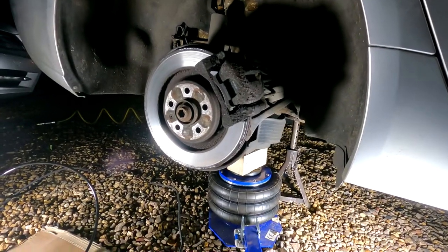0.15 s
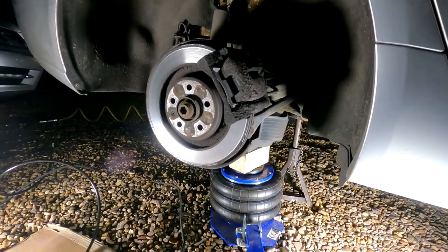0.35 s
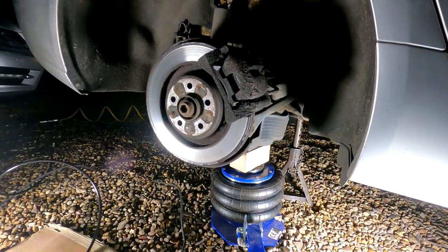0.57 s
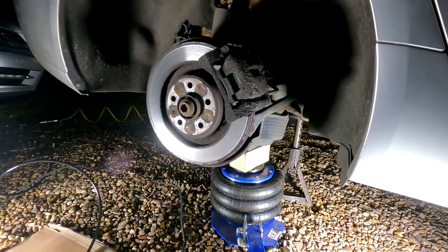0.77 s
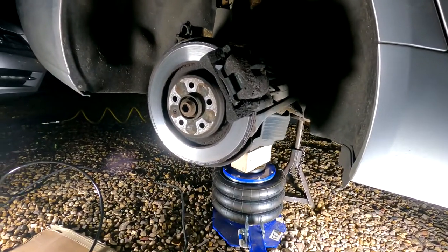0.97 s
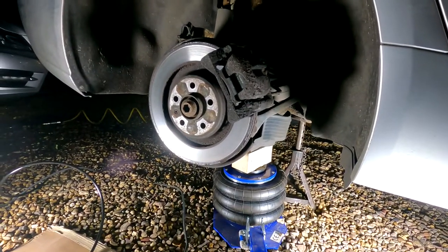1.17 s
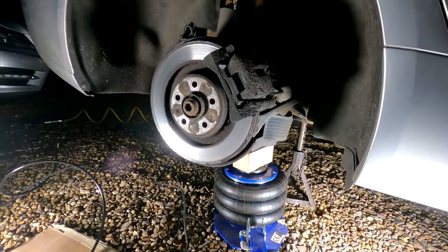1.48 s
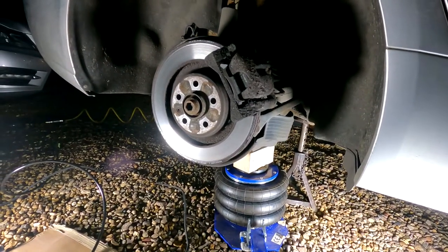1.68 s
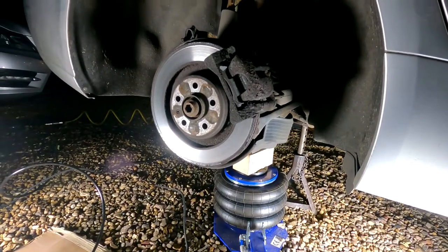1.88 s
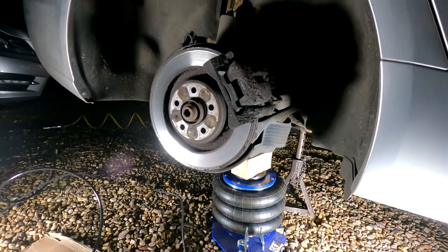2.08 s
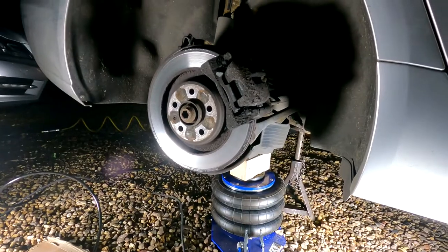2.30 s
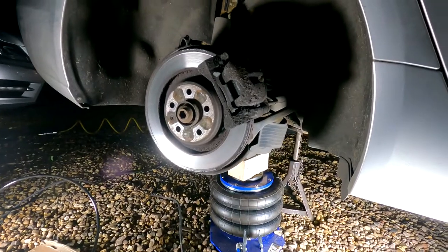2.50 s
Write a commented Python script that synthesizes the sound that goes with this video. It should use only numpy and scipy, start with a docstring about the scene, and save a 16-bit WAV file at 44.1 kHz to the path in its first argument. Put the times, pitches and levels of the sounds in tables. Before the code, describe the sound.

Compressed air hisses and whistles steadily into an air-bag jack, with a thump and a clack.

```python
"""A steady, whistling hiss: compressed air fills a rubber air-bag jack under a car on gravel, close by.
The jet hisses with early echoes and sings in resonances of valve and hose that shift as pressure builds.
Over an uneven low rumble the load settles with light ticks, two small hollow knocks, two dull thumps
and one sharp clack that rings the jack."""
import sys
import numpy as np
from scipy import signal
from scipy.fft import rfft, irfft
from scipy.io import wavfile

SR = 44100
rng = np.random.default_rng(int(sys.argv[2]) if len(sys.argv) > 2 else 0)


def int16_out(signal):
    """Quantize to a 16-bit WAV file."""
    q = np.round(np.clip(np.atleast_2d(signal).T, -1, 1) * 32767)
    wavfile.write(sys.argv[1], SR, q.astype(np.int16))


N = 116865

# tone colour of a light contact, for ticks and knocks: freq_hz, level_db
CONTACT_COLOUR = [(100, -25.5), (500, -5.5), (1400, -1), (3500, -5), (8000, -11.5), (10500, -22),
                  (14000, -33)]


def undb(db):
    """Decibels to gain."""
    return 10 ** (np.asarray(db) / 20)


def unit(x):
    """Scale to rms 1."""
    return x / np.sqrt(np.mean(x ** 2))


def freqs():
    """Frequency of each spectral bin, at least 1 Hz."""
    return np.maximum(np.arange(N // 2 + 1) * SR / N, 1)


def across(points):
    """Join (freq_hz, value) points on a log-frequency axis."""
    hz, value = np.array(points, float).T
    return np.interp(np.log(freqs()), np.log(hz), value)


def noise(gain):
    """Noise of rms 1, coloured by a gain per bin."""
    return unit(irfft(rfft(rng.standard_normal(N)) * gain, N))


def wide(gain, diffuse):
    """Stereo noise: a shared centre plus a diffuse part of its own in each ear."""
    return (noise(gain) + diffuse * np.array([noise(gain), noise(gain)])) / np.hypot(1, diffuse)


def walk(hz):
    """Slow random wander of rms 1."""
    return noise(1 / (1 + (freqs() / hz) ** 2))


def pan(db):
    """Stereo gains that put the left db above the right."""
    return undb(np.array([[db], [-db]]) / 2)


def decay(age, t60):
    """Silence, then an exponential fall of 60 dB in t60 seconds."""
    return (age >= 0) * np.exp(-np.log(1000) * np.maximum(age, 0) / t60)


def burst(age, colour_db, db, tilt_db, t60, diffuse):
    """A short burst of contact noise, tilted by tilt_db per octave."""
    colour = undb(colour_db + tilt_db * np.log2(freqs()))
    return wide(colour, diffuse) * undb(db) * decay(age, t60)


def ring(age, modes):
    """Struck modes that fade, each at its own rate."""
    return sum(undb(db) * np.sin(2 * np.pi * hz * age) * decay(age, t60) for hz, db, t60 in modes)


def click(start_s, colour_db, peak_db):
    """A single sharp pressure pulse."""
    pulse = irfft(undb(colour_db) * np.exp(-2j * np.pi * freqs() * start_s), N)
    return pulse / np.abs(pulse).max() * undb(peak_db)


def rumble(t):
    """A low bed in two bands, deep bass and the body above it, that comes in uneven swells."""
    # swells of the two bands: time_s, bass_db, body_db
    swells = [(0, -40, -43.5), (.12, -34.5, -37.5), (.17, -41.5, -45), (.28, -31.5, -38), (.34, -40, -45),
              (.40, -45.5, -49.5), (.80, -51, -56), (1.03, -42, -50), (1.17, -50, -54),
              (1.259, -42.5, -37.5), (1.32, -47, -54), (1.41, -37, -41.5), (1.5, -39, -48),
              (1.61, -56, -50.5), (1.66, -44, -34.5), (1.76, -39.5, -34), (1.85, -45, -48),
              (1.99, -32, -36), (2.07, -42.5, -46.5), (2.19, -38.5, -46.5), (2.3, -45.5, -48.5),
              (2.45, -45.5, -48), (2.536, -33, -32), (2.61, -42.5, -40.5), (2.65, -33, -40)]
    # tone colour of the bass: freq_hz, level_db
    bass_colour = [(15, -41), (35, -15), (60, 3), (90, 1), (120, -7), (200, -22.5), (500, -58), (2000, -75)]
    # tone colour of the body: freq_hz, level_db
    body_colour = [(60, -42), (110, -6), (145, 2.5), (210, -3.5), (270, -11.5), (330, -14), (450, -24),
                   (900, -34), (3000, -54)]
    time_s, bass_db, body_db = np.array(swells).T
    bass = wide(undb(across(bass_colour)), diffuse=0.013) * undb(np.interp(t, time_s, bass_db))
    body = wide(undb(across(body_colour)), diffuse=0.04) * undb(np.interp(t, time_s, body_db))
    return (bass + body) * pan(db=-1)


def ticks(t):
    """Small slips of jack and gravel under the growing load, each with a hollow ring."""
    # light ticks and scrapes: start_s, level_db, tilt_db_per_octave, ring_hz, t60_s
    slips = [(0.51, -36.5, -1.5, 3200, 0.051), (0.625, -37, -0.5, 4360, 0.07), (1.056, -35, 3, 8450, 0.036),
             (1.399, -20.5, 1, 2010, 0.011), (1.403, -36, -2, 1590, 0.1), (1.441, -34, 3, 1610, 0.084),
             (1.661, -35, -1.5, 4180, 0.069), (1.675, -28.5, 1, 3100, 0.04), (1.694, -37, 0, 3100, 0.071),
             (1.713, -34.5, 0, 1760, 0.063), (1.722, -32.5, 1, 1510, 0.15), (1.886, -37.5, 1, 1590, 0.14),
             (1.916, -30, 0, 1560, 0.038), (2.009, -37.5, 0, 1580, 0.049), (2.61, -36, -4.5, 1080, 0.059)]
    boost_db, width_octaves = 8.5, 0.14
    out = 0
    for start_s, db, tilt_db, ring_hz, t60 in slips:
        ring_db = boost_db * np.exp(-(np.log2(freqs() / ring_hz) / width_octaves) ** 2)
        out = out + burst(t - start_s, across(CONTACT_COLOUR) + ring_db, db, tilt_db, t60, diffuse=0.46)
    return out


def knocks(t):
    """Dull contacts that leave a brief hollow ring."""
    # small knocks: start_s, level_db
    hits = [(.249, -31.5), (1.186, -40.5)]
    # their hollow ring: pitch_hz, relative_db, t60_s
    modes = [(584, -8.5, 0.076), (1080, -5, 0.082), (1170, -7.5, 0.074)]
    out = 0
    for start_s, db in hits:
        contact = burst(t - start_s, across(CONTACT_COLOUR), db, tilt_db=-3.5, t60=.045, diffuse=0.53)
        out = out + contact + undb(db) * ring(t - start_s, modes)
    return out


def thumps(t):
    """The load settles: a snap, then a tone that dives from midrange to bass within milliseconds."""
    # dull thumps: start_s, level_db, snap_db, left_over_right_db
    hits = [(1.541, -9, -9.5, -9.5), (2.3185, -25, -52, -10)]
    # tone colour of the snap: freq_hz, level_db
    snap_colour = [(300, -6), (1100, 6.5), (2000, -2.5), (3300, -10.5), (5500, -2), (7000, -12),
                   (9000, -20), (14000, -47)]
    start_hz, first_octave_s, attack_s = 2340, 0.000208, 0.0013
    out = 0
    for start_s, db, snap_db, pan_db in hits:
        age = np.maximum(t - start_s, 0)
        phase = 2 * np.pi * start_hz * first_octave_s * np.log1p(age / first_octave_s)
        dive = -np.sin(phase) * (1 - np.exp(-age / attack_s)) * decay(age, t60=0.064)
        snap = click(start_s, across(snap_colour), snap_db)
        out = out + pan(pan_db) * (undb(db) * dive - snap)
    return out


def clack(t):
    """The load slips and catches with a double crack, rings the jack and rattles to rest."""
    # tone colour of the crack: freq_hz, level_db
    crack_colour = [(100, -20), (500, 4), (1500, 0), (2400, 0), (3900, -1.5), (5000, -25), (7700, -16),
                    (14000, -28)]
    # the hit and its rebounds: start_s, level_db, tilt_db_per_octave, t60_s
    bounces = [(1.7369, -16.5, 1.5, 0.015), (1.7386, -27, 0.5, 0.068), (1.749, -25, -2, 0.056),
               (1.755, -30, -8.5, 0.025), (1.775, -34, -3, 0.12)]
    # tone colour of the rattle: freq_hz, level_db
    rattle_colour = [(60, -23), (250, -12), (500, 2), (900, 3.5), (1600, 4.5), (2300, -12), (4000, -2.5),
                     (5000, -26), (8000, -10.5), (10500, -24), (11800, -12), (14500, -43)]
    # ring of the loaded jack: pitch_hz, relative_db, t60_s
    jack_modes = [(232, 4.5, 0.057), (301.5, 8.5, 0.0604), (513, -3, 0.05), (712, -1.5, 0.074),
                  (976, -9, 0.16), (1060, -3.5, 0.094), (1310, -3, 0.053), (1574, 7, 0.05),
                  (1673, 2, 0.036)]
    slip_s, catch_s, crack_db, ring_db = 1.7369, 1.7378, -8, -26
    slip = click(slip_s, across(crack_colour), crack_db)
    catch = -click(catch_s, across(crack_colour), crack_db)
    rattle = sum(burst(t - start_s, across(rattle_colour), db, tilt_db, t60, diffuse=0.46)
                 for start_s, db, tilt_db, t60 in bounces)
    return slip + catch + rattle + undb(ring_db) * ring(t - catch_s, jack_modes)


def reflections(count):
    """Early echoes off ground and bodywork, as a comb filter with a gain per bin."""
    echo_db = -13.5
    delays_s = rng.uniform(0.0019, .014, (count, 1))
    return 1 + undb(echo_db) * np.exp(-2j * np.pi * freqs() * delays_s).sum(axis=0)


def hiss(t):
    """Broad noise of the air jet, combed by early echoes and easing off slowly."""
    # tone colour of the jet: freq_hz, level_db
    colour = [(200, 0), (450, -5.5), (900, -0.5), (1200, -2.5), (1500, 4), (1720, -4), (2400, 1), (3000, 0),
              (3600, -2), (4400, 0.5), (5700, -3.5), (7200, 2.5), (8000, -8), (10200, -4.5), (11100, -11.5),
              (12000, -2.5), (12800, -11.5), (13800, -14.5)]
    # stereo width of the jet: freq_hz, diffuse_share
    width = [(100, 0.2), (500, 0.72), (2000, 0.39), (3700, 0.5), (6500, 0.19), (9500, 0.61), (11500, 0.3),
             (12800, 0.98)]
    start_db, fade_db_per_s = -43.5, -0.81
    share = across(width).clip(.01, .95)
    centre = rfft(rng.standard_normal(N)) * np.sqrt(1 - share ** 2) * reflections(count=6)
    diffuse = share * rfft(rng.standard_normal((2, N)))
    rush = unit(irfft(undb(across(colour)) * (centre + diffuse), N))
    return rush * undb(start_db + fade_db_per_s * t)


def whistles(t):
    """Turbulence drives narrow resonances that glide and trade strength as the bag fills."""
    # resonances of valve and hose: start_hz, end_hz, width_hz, start_db, end_db
    resonances = [(716, 725, 20, -55.5, -73.5), (1316, 1355, 38, -58, -59.5), (1911, 2005, 50, -46.5, -49),
                  (1953, 2090, 66, -43.5, -53), (2198, 2230, 39.6, -45, -43.5),
                  (2305, 2340, 88, -55, -49.5), (2548, 2670, 45, -45, -67.5),
                  (2908, 2890, 45, -55.5, -65.5), (4135, 4200, 93, -57, -58), (6490, 6465, 22, -51, -51.5),
                  (4946, 4960, 27, -56.5, -57.5), (5170, 5160, 41, -55, -58.5),
                  (5740, 5820, 54, -62.5, -58.5), (6094, 6560, 39, -51, -54),
                  (6620, 6600, 370, -51.5, -51.5), (6990, 6958, 20, -50.5, -49),
                  (7030, 7210, 31, -55.5, -56), (7280, 7332, 49, -50.5, -58), (7430, 7440, 38, -59, -59),
                  (10500, 10540, 170, -65.5, -61)]
    # swells added to the low and the high whistles: time_s, low_db, high_db
    swells = [(0, .5, -1.5), (.6, -1.5, .5), (.76, 0.5, 3.5), (.9, -1, 0.5), (1.2, 2, 0.5),
              (1.85, -1, -1.5), (2.65, 1, -0.5)]
    high_above_hz, waver_share, flutter_db = 6000, .003, 1.5
    time_s, low_db, high_db = np.array(swells).T
    fill = t / t[-1]
    out = 0
    for start_hz, end_hz, width_hz, start_db, end_db in resonances:
        glide_hz = start_hz + (end_hz - start_hz) * fill
        pitch_hz = glide_hz * (1 + waver_share * walk(hz=9.06))  # unsteady flow bends the pitch
        phase = 2 * np.pi * np.cumsum(pitch_hz) / SR
        # slow noise shifted up to the pitch makes a breathy tone about width_hz wide
        band = 1 / (1 + (freqs() / (0.81 * width_hz)) ** 2)
        tone = wide(band, diffuse=0.15) * np.cos(phase) + wide(band, diffuse=0.15) * np.sin(phase)
        level_db = start_db + (end_db - start_db) * fill
        swell_db = np.interp(t, time_s, high_db if start_hz > high_above_hz else low_db)
        out = out + tone * undb(level_db + swell_db + flutter_db * walk(hz=7.1))
    return out


def air_jet(t):
    """Hiss and whistles flutter together and reach left and right slightly apart."""
    # stereo balance of the jet: freq_hz, left_over_right_db
    balance = [(500, 1.5), (1250, 1.3), (2300, -1.5), (4000, 0), (6500, 0), (6950, 3.5), (7500, -0.5),
               (9700, 1.5), (13000, -2)]
    # phase between the two sides: freq_hz, left_lead_rad
    lead = [(300, 0.28), (1150, -0.46), (1700, -0.26), (2200, -0.63), (3200, -0.77), (5000, -0.53),
            (7200, -0.49), (9000, -0.34), (12000, 0)]
    flutter_db = 0.39
    jet = (hiss(t) + whistles(t)) * undb(flutter_db * walk(hz=2.6))
    side = np.array([[.5], [-.5]])
    placement = undb(side * across(balance)) * np.exp(1j * side * across(lead))
    return irfft(rfft(jet) * placement, N)


def scene():
    """The air jet over the rumble and the noises of the settling load."""
    t = np.arange(N) / SR
    return air_jet(t) + rumble(t) + ticks(t) + knocks(t) + clack(t) + thumps(t)


def record(dry):
    """A steep low-pass takes off the very top."""
    cutoff_hz = 14100
    return signal.sosfilt(signal.ellip(8, .2, 70, cutoff_hz, fs=SR, output="sos"), dry)


dry = scene()
out = record(dry)
int16_out(out)
```